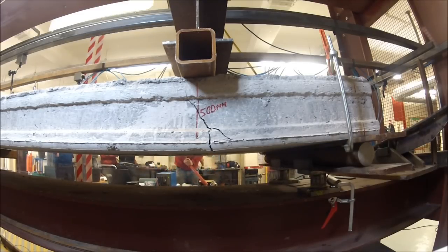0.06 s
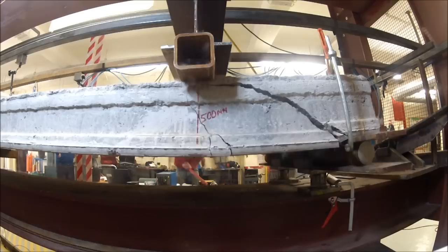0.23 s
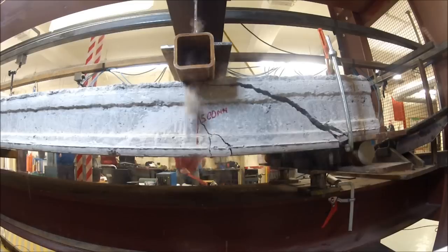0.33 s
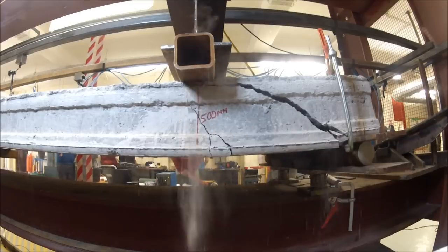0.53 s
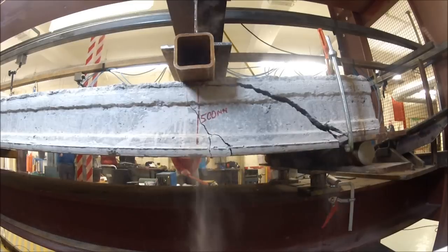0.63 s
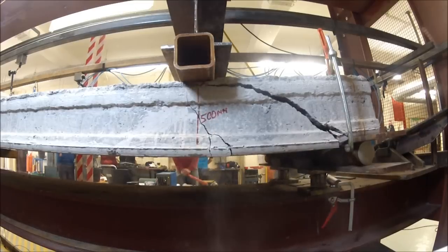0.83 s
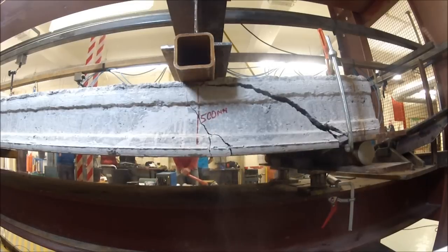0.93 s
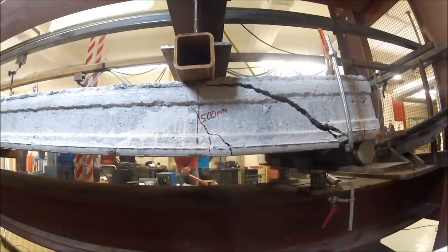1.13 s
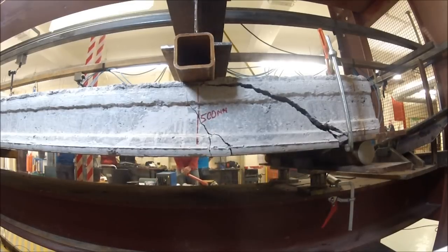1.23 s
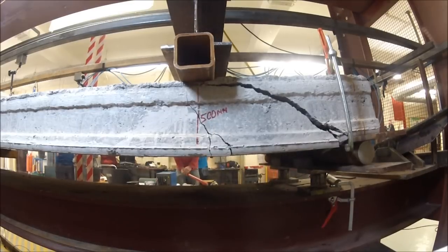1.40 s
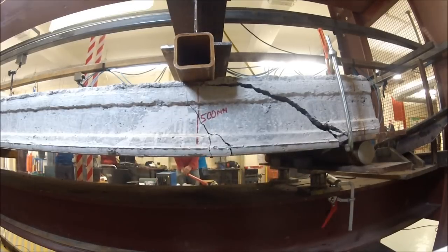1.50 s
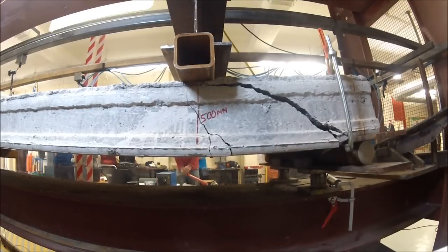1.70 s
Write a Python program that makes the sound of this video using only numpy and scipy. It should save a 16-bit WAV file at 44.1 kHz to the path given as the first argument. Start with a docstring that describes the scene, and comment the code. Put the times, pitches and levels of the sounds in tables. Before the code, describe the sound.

Loud cracking bang of breaking concrete, followed by crumbling, trickling grit and a low hum.

```python
"""A concrete slab shears under a press in a large test hall, close to a camera in a hard case.
A volley of cracks sets the slab booming and thumping, and rings the steel rig that holds it.
The broken faces grind and crumble for half a second, then grit trickles down.
The heavy rig sways with a very low hum, and the hall's echo dies away over its ventilation.
The case colours the cracks, the grinding and their echo."""
import sys
import numpy as np
from scipy import signal
from scipy.fft import rfft, irfft, next_fast_len
from scipy.io import wavfile

SR = 44100
rng = np.random.default_rng(int(sys.argv[2]) if len(sys.argv) > 2 else 0)


def wrap_up_sound(samples):
    """Save the sound to the file named by the first command line argument, as 16-bit audio."""
    columns = np.atleast_2d(samples).T
    # keep every value between -1 and 1, then stretch to whole-number steps
    tamed = np.clip(columns, -1, 1)
    steps = np.round(tamed * 32767).astype(np.int16)
    wavfile.write(sys.argv[1], SR, steps)


N = 77175  # 1.75 seconds
BREAK_S = 0.229  # when the slab gives way

# Tone of the ventilation, from low to high: pitch_hz, relative_db
VENT_TONE = [(15, -33), (30, -18), (60, -7), (80, -5.5), (150, -8), (350, -9.5), (700, -21.5),
             (2000, -39.5)]
# How long the hall's echo takes to fade by 60 dB: pitch_hz, fade_s
HALL_FADE = [(150, 1.75), (1000, 1.64), (2500, 1.37), (6000, 1.23), (14000, 1.43)]
# Broad tone of the camera case: pitch_hz, relative_db
CASE_TONE = [(30, -12), (80, -29), (160, -0.5), (400, -8), (620, -11.5), (850, -7), (1400, -10),
             (1650, -1.5), (2000, -3.5), (2500, -6), (3600, -10), (4400, -15), (5300, -18.5), (6000, -29),
             (6700, -20.5), (8300, -16.5), (9600, -15.5), (10400, -21), (11400, -30), (12700, -29.5),
             (13700, -22), (15200, -19.5), (15450, -46), (16500, -92)]
# Narrow bands that the case boosts, and one that it cuts: pitch_hz, half_width_hz, boost_db
CASE_BANDS = [(1130, 115, 9), (1805, 80, 10), (2245, 125, 8), (2735, 75, 5), (3340, 80, 4), (3690, 80, 4),
              (6030, 140, -4), (9280, 90, 4), (9730, 100, 9), (10190, 115, 13), (10850, 130, 8),
              (13150, 120, 9), (13820, 110, 12), (14260, 110, 10), (14740, 110, 4)]
# Notes at which the steel rig rings: pitch_hz, gain_db
STEEL_NOTES = [(1202, -20.5), (1766, -24), (1838, -26), (2270, -13), (2712, -26), (2767, -28), (3335, -41),
               (4680, -28.5)]
# Loudness of the shifting slab's rumble over time: time_s, level_db
RUMBLE_LEVELS = [(.229, -19), (.33, -22.5), (.39, -29), (.44, -19.5), (.55, -30.5), (.63, -24), (.72, -30),
                 (.86, -34), (1.0, -39.5), (1.13, -44), (1.19, -43), (1.28, -46.5), (1.45, -54),
                 (1.75, -53.5)]
# Tone of that rumble: pitch_hz, relative_db
RUMBLE_TONE = [(20, -48), (42, -13), (55, -21), (68, -30), (86, -14.5), (101, 3), (120, -16), (154, 5),
               (183, -7), (215, -1), (245, -10.5), (275, -7.5), (330, -12.5), (440, -20), (560, -26),
               (1000, -49), (3000, -110)]
# Heavy blows as the slab gives way and drops: start_s, level_db, pitch_hz, fade_s
SLAB_THUMPS = [(.229, -17, 360, .11), (.2425, -21, 1020, .06), (.312, -31, 52, .16)]
# Notes at which the slab rings on its supports: pitch_hz, level_db, fade_s
SLAB_NOTES = [(107.4, -33, 0.44), (140.2, -6.5, 0.25), (262, -28.5, 0.75), (355.8, -19.5, 0.45),
              (429.4, -17.5, 0.24)]
# Loudness of the grinding faces over time: time_s, level_db
GRIND_LEVELS = [(.229, -15.5), (.27, -17.5), (.295, -19), (.325, -16), (.39, -17.5), (.407, -24.5),
                (.425, -20), (.55, -24), (.6, -20.5), (.69, -25), (.76, -32.5), (.86, -37.5), (1.0, -46),
                (1.3, -46.5), (1.75, -54.5)]
# Cracks running through the concrete: start_s, level_db
SLAB_CRACKS = [(0.223, -36), (0.2265, -21.5), (0.2322, -7.5), (0.2402, -13), (0.2403, -10), (0.2432, -7.5),
               (0.2471, -11), (0.259, -39), (0.2652, -14), (0.3026, -19), (0.323, -27.5), (0.3586, -15.5),
               (0.378, -12.5), (0.4143, -13), (0.4329, -23.5), (0.593, -28), (0.6514, -23)]


def amp(db):
    """Turn decibels into a gain to multiply by."""
    return 10 ** (np.asarray(db) / 20)


def fade(t, fade_s):
    """A gain that falls by 60 dB every fade_s seconds."""
    return amp(-60 * t / fade_s)


def unit(x):
    """Scale a signal to an average power of 1."""
    return x / np.sqrt(np.mean(x ** 2) + 1e-20)


def along(points, hz):
    """Read between (pitch_hz, value) rows, with pitch on a log scale."""
    pitches, values = np.transpose(points)
    return np.interp(np.log(hz + 1), np.log(pitches + 1), values)


def since(start_s):
    """Seconds since a moment, zero before it."""
    return np.maximum(np.arange(N) / SR - start_s, 0)


def loudness(rows):
    """A gain that follows (time_s, level_db) rows, silent until the slab breaks."""
    return amp(np.interp(since(0), *np.transpose(rows))) * (since(BREAK_S) > 0)


def coloured(x, tone_db):
    """Give a sound the tone tone_db(hz), with a filter whose average power gain is 1."""
    size = 2 * next_fast_len(N)
    gains = unit(amp(tone_db(np.fft.rfftfreq(size, 1 / SR))))
    cepstrum = irfft(np.log(np.maximum(gains, 1e-6)), size)
    # Fold it so that the filter rings only after a sound, never before.
    cepstrum[1:size // 2] *= 2
    cepstrum[size // 2 + 1:] = 0
    return irfft(rfft(x, size) * np.exp(rfft(cepstrum)), size)[:N]


def ventilation(level_db=-60.5):
    """The hall's ventilation makes a steady low rush."""
    return amp(level_db) * coloured(rng.standard_normal(N), lambda hz: along(VENT_TONE, hz))


def hall_echo(x, gain_db=-7.5, build_s=0.028):
    """The hall smears a sound into an echo that builds up, then dies sooner in the treble."""
    hz, t, noise = signal.stft(rng.standard_normal(N), SR, nperseg=256)
    fading = noise * fade(t, along(HALL_FADE, hz)[:, None])
    tail = signal.istft(fading * (1 - np.exp(-t / build_s)), SR, nperseg=256)[1]
    return amp(gain_db) * signal.fftconvolve(x, tail / np.linalg.norm(tail))[:N]


def case_tone_db(hz):
    """The hard case lets some pitches through better than others."""
    bands = sum(db / (1 + ((hz - centre) / width) ** 4) for centre, width, db in CASE_BANDS)
    return along(CASE_TONE, hz) + bands


def rig_sway(start_s=0.33, pitch_hz=22.1, level_db=-32.5, rise_s=0.43):
    """The heavy rig slowly swings up at its lowest note and rings on."""
    t = since(start_s)
    swell = np.minimum(t / rise_s, 1) * fade(np.maximum(t - rise_s, 0), fade_s=5.1)
    phase = 2 * np.pi * pitch_hz * t
    octave_above = amp(-9.5) * np.sin(2 * phase)
    return amp(level_db) * swell * (np.sin(phase) + octave_above)


def steel_ring(snaps):
    """Every snap of the concrete rings the steel rig a little."""
    t = since(0)
    dying = fade(t, fade_s=0.45)
    ring = sum(amp(db) * unit(np.sin(2 * np.pi * hz * t) * dying) for hz, db in STEEL_NOTES)
    return signal.fftconvolve(snaps, ring / np.sqrt(N))[:N]


def slab_rumble():
    """The broken slab rumbles as it shifts."""
    shifting = loudness(RUMBLE_LEVELS) * rng.standard_normal(N)
    return coloured(shifting, lambda hz: along(RUMBLE_TONE, hz))


def slab_thumps(width_octaves=0.37, rise_s=0.0005):
    """The lurching slab gives the air short, dull pushes."""
    thumps = np.zeros(N)
    for start_s, db, pitch_hz, fade_s in SLAB_THUMPS:
        t = since(start_s)
        noise = rng.standard_normal(N)
        body = coloured(noise, lambda hz: -3 * (np.log2((hz + 1) / pitch_hz) / width_octaves) ** 2)
        thumps += amp(db) * body * fade(t, fade_s) * (1 - np.exp(-t / rise_s))
    return thumps


def slab_boom(rise_s=0.006):
    """The sudden release of the load sets the slab ringing."""
    t = since(BREAK_S)
    ring = sum(amp(db) * fade(t, fade_s) * np.sin(2 * np.pi * hz * t) for hz, db, fade_s in SLAB_NOTES)
    return ring * (1 - np.exp(-t / rise_s))


def grinding(snaps_per_s=1500, spread_db=2):
    """Crushed stones make many snaps of uneven size, over an equally loud hiss of dust."""
    sizes = amp(spread_db * np.minimum(rng.exponential(size=N), 4))
    signs = rng.choice([-1, 1], N)
    snaps = unit(sizes * signs * (rng.random(N) < snaps_per_s / SR))
    dust = rng.standard_normal(N)
    return loudness(GRIND_LEVELS) * unit(snaps + dust)


def cracks(fade_s=0.028):
    """Each crack in the concrete is a sudden, very short burst of noise."""
    return sum(amp(db) * fade(since(start_s), fade_s) * (since(start_s) > 0) * rng.standard_normal(N)
               for start_s, db in SLAB_CRACKS)


def scene():
    """The breaking and its echo pass through the case; the heavy shaking comes through the rig."""
    breaking = cracks() + grinding()
    echo = hall_echo(breaking)
    faint_hiss = amp(-65.5) * rng.standard_normal(N)
    through_case = coloured(breaking + echo + faint_hiss, case_tone_db)
    through_rig = steel_ring(breaking) + slab_boom() + slab_rumble() + slab_thumps() + rig_sway()
    return (through_case + through_rig + ventilation())[None]


def record(dry, ceiling=0.86, top_hz=15900):
    """The camera rounds off the tallest peaks and cuts the highest treble."""
    rounded = dry / (1 + np.abs(dry / ceiling) ** 6) ** (1 / 6)
    treble_cut = signal.ellip(10, .1, 90, top_hz, fs=SR, output="sos")
    return signal.sosfilt(treble_cut, rounded)


dry = scene()
out = record(dry)
wrap_up_sound(out)
```